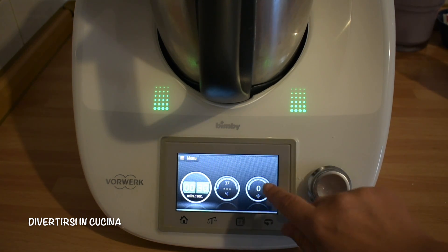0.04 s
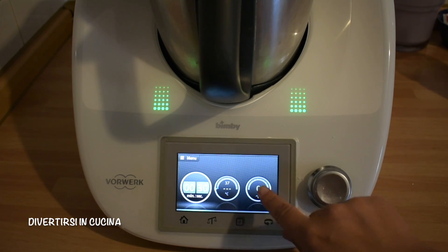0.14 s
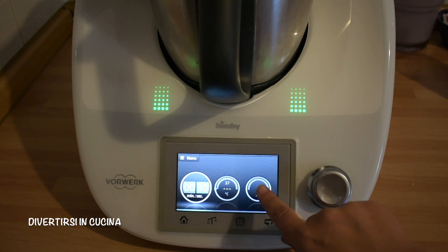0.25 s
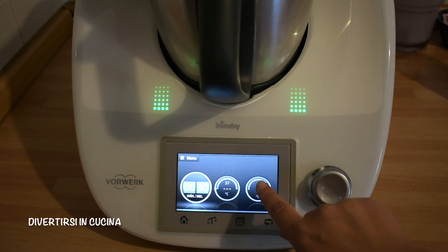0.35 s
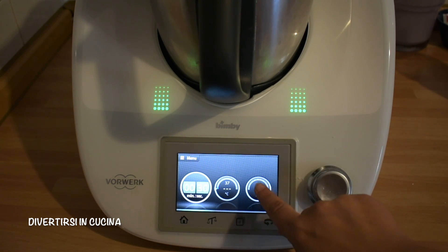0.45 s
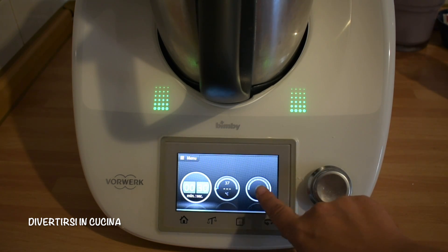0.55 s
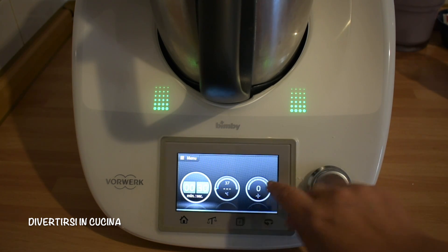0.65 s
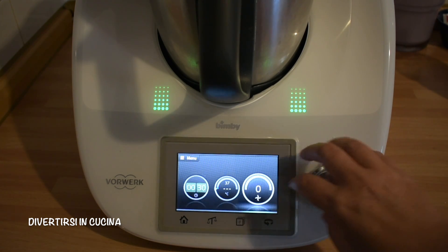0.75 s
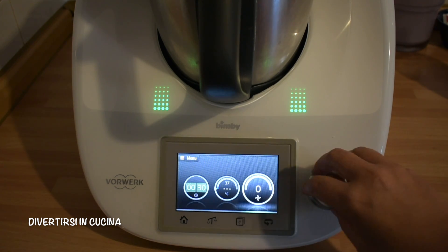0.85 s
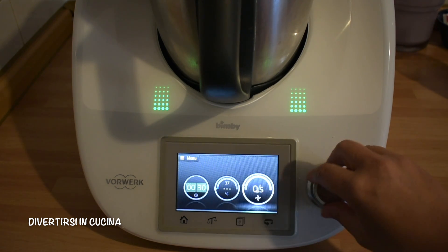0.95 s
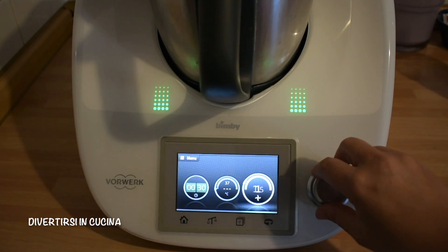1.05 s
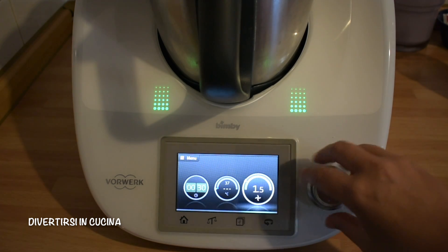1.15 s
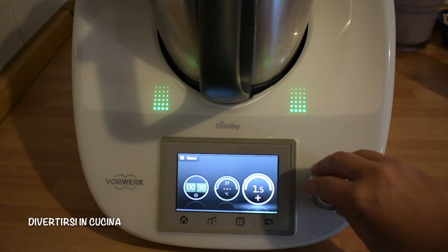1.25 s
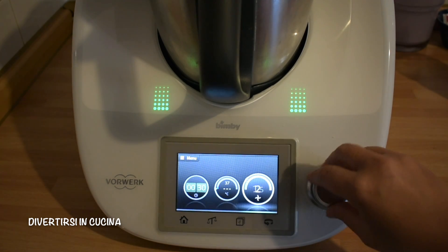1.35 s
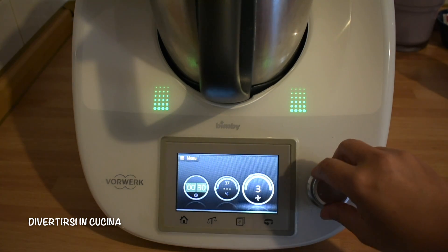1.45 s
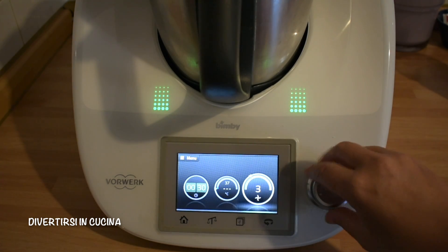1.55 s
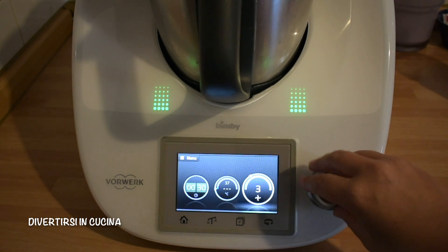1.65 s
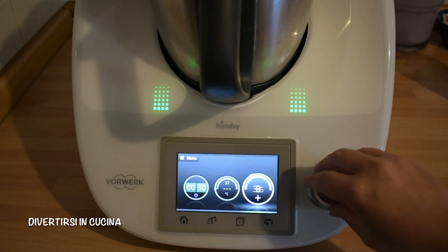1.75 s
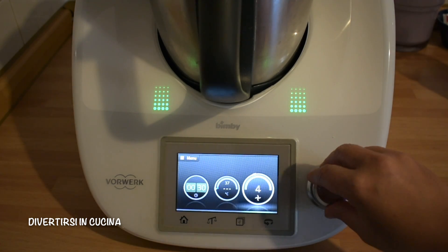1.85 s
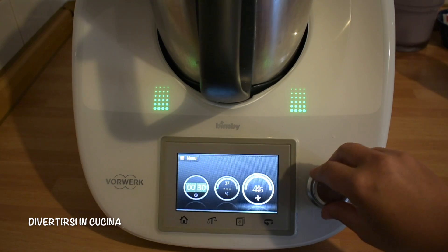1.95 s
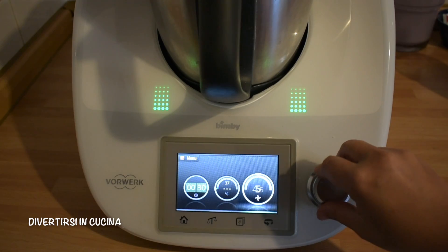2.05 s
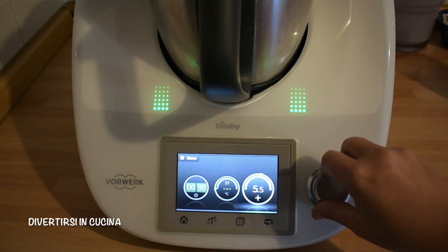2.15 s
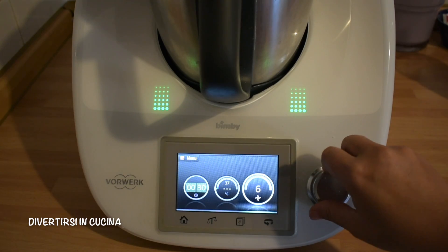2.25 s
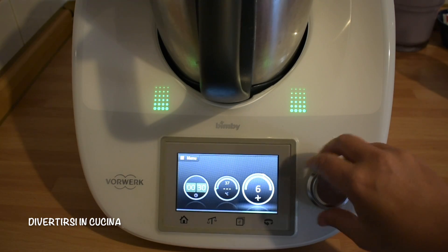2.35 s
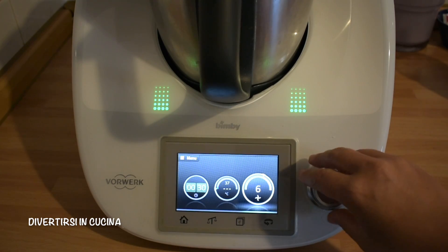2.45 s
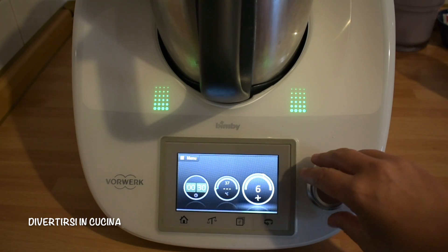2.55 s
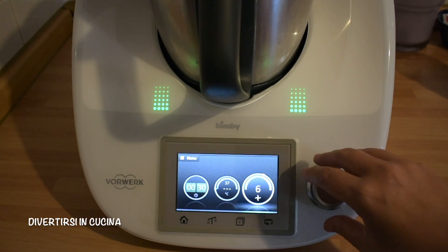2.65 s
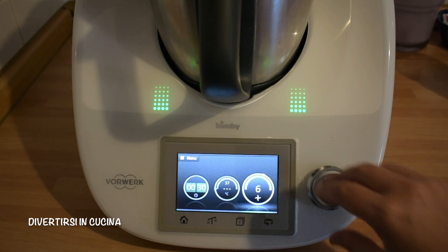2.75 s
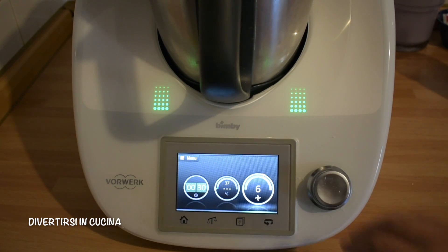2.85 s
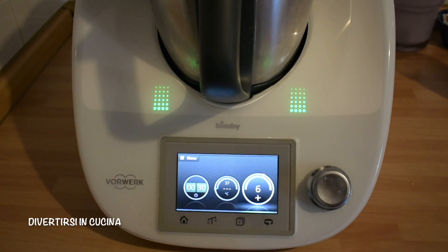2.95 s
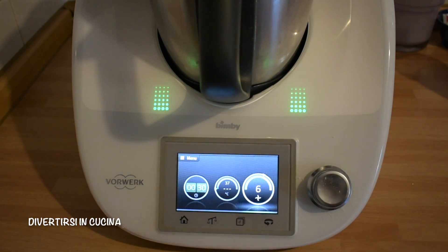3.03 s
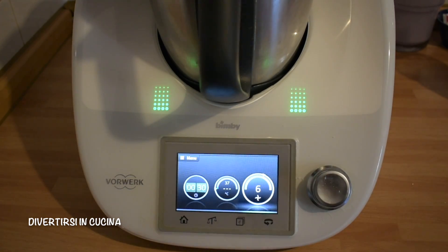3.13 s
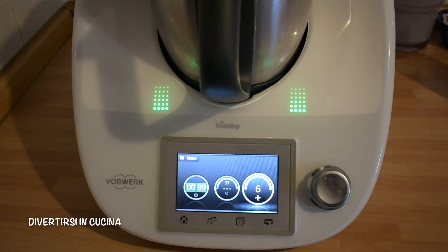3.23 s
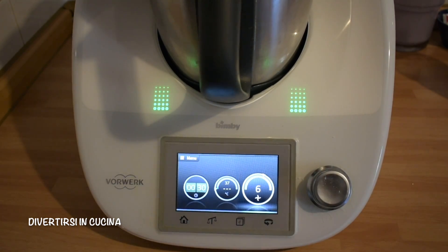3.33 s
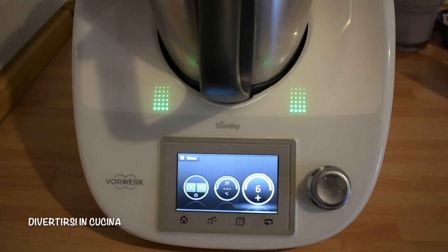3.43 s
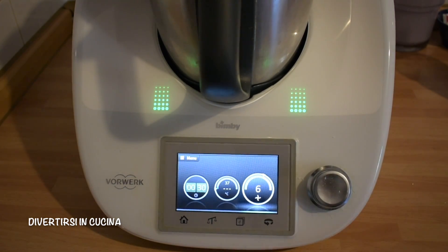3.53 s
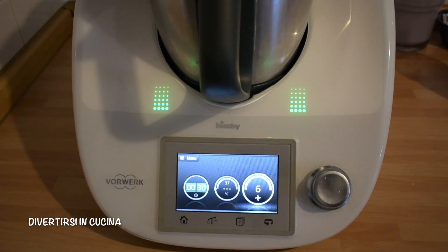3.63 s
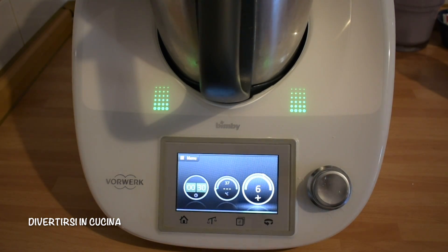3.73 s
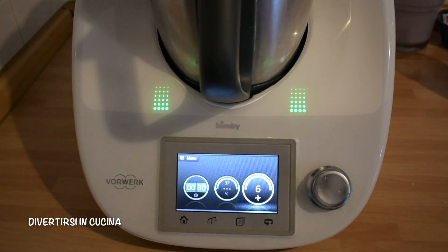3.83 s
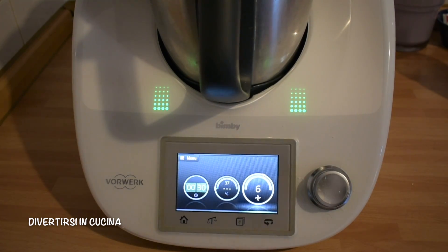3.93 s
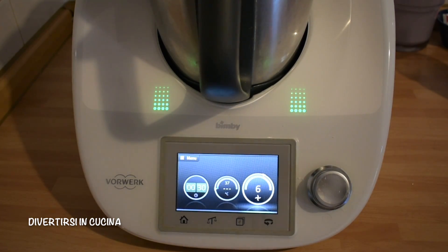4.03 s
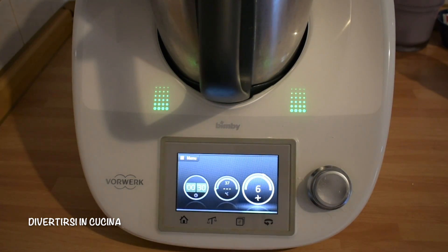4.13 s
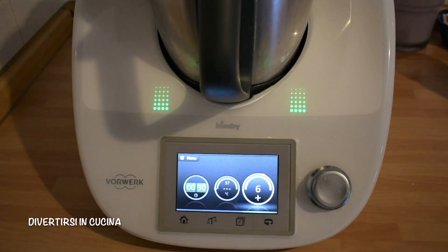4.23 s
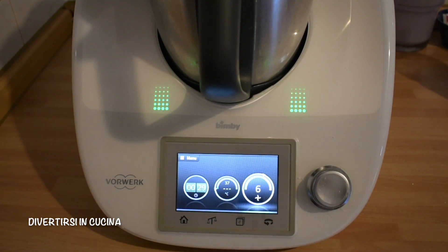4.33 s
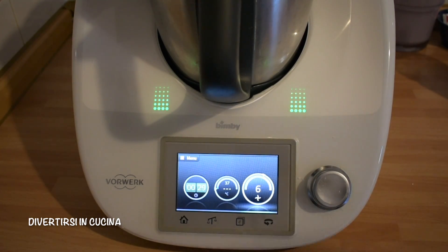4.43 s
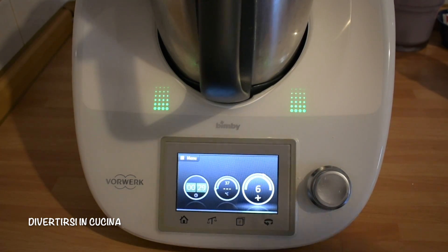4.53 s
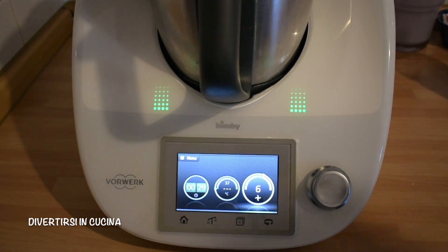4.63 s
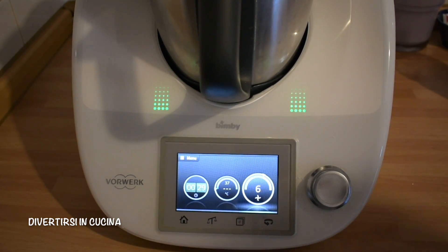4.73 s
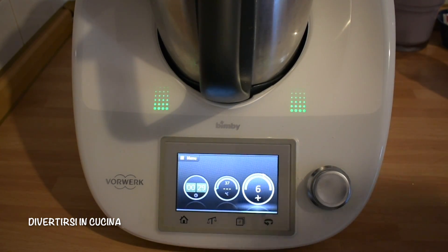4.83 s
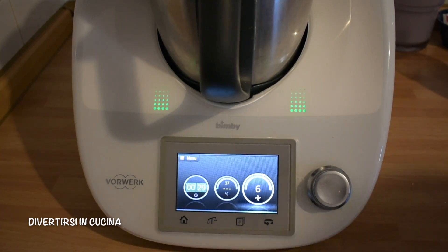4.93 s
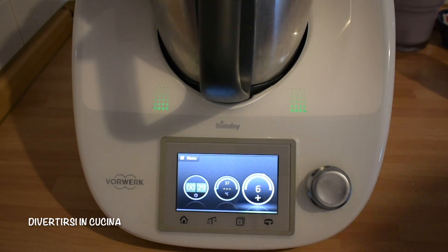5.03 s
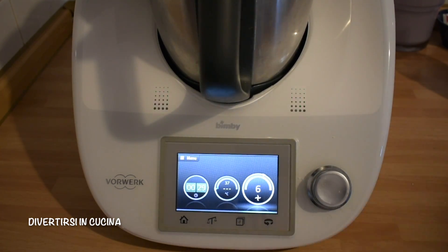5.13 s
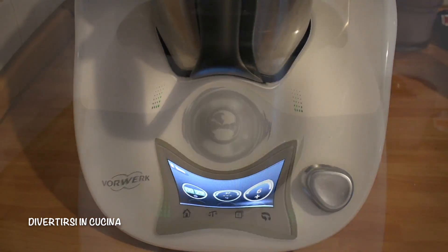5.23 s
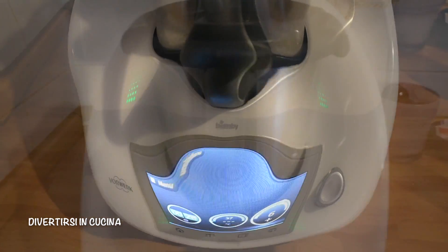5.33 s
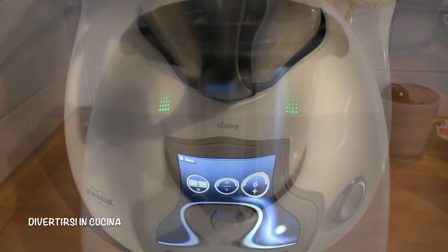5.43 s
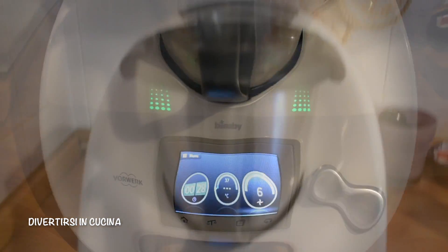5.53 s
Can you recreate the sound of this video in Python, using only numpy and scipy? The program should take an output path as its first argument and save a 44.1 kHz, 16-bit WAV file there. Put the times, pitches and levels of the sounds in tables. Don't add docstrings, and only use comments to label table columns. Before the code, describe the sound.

A kitchen food processor, miked very close in a small room with short reverberation. From 0 to 0.5 s a low room rumble fades while a distant bird chirps faintly outside. From about 0.97 s crisp plastic clicks come in an irregular cluster until 1.2 s, with soft hand thuds; more follow at 1.4-1.5 s and 1.8-2.3 s. Beneath them, from 1.0 to 1.7 s, a small geared motor whirs with a buzzy whine, sagging in pitch as it strains and stalls. A quiet gap, then a hard, bright relay snap at 2.65 s. From 2.85 s the main motor gives faint accelerating jerks, breaks into rotation near 3.1 s with a strong metallic ring around 1.9 kHz, and is loud by 3.2 s. Until the end at about 5.6 s it runs nearly steady: midrange hum and whine, steel jug rattle, gritty hiss, and irregular surges as nuts strike the blade, rising slightly in pitch near 4.65 s.

```python
import sys
import numpy as np
from scipy import signal
from scipy.fft import rfft, irfft, next_fast_len
from scipy.io import wavfile
from scipy.ndimage import map_coordinates

SR = 44100
rng = np.random.default_rng(int(sys.argv[2]) if len(sys.argv) > 2 else 0)


def wav_record(signal):
    frames = np.transpose(np.atleast_2d(signal))
    bounded = np.clip(frames, -1, 1)
    quanta = np.round(bounded * 32767).astype(np.int16)
    wavfile.write(sys.argv[1], SR, quanta)


def convert_level_to_amplitude(level_db):
    exponent = np.asarray(level_db, float) / 20
    return 10 ** exponent


N = 246078
TIME = np.arange(N) / SR


def unit(x):
    return x / np.sqrt(np.mean(x ** 2) + 1e-20)


def along(points, hz):
    f, v = np.transpose(points)
    return np.interp(np.log(hz + 1), np.log(f + 1), v)


def curves(rows):
    s, *columns = np.transpose(rows)
    return [np.interp(TIME, s, column) for column in columns]


def wobble(rate):
    knots = rng.standard_normal(int(N * rate / SR) + 4)
    return map_coordinates(knots, [TIME * rate])


def envelope(s, db, attack, hold, t60):
    rise = np.clip((TIME - s) / attack, 0, 1) ** 2
    released_s = np.clip(TIME - s - attack - hold, 0, None)
    return rise * convert_level_to_amplitude(db - 60 * released_s / t60)


def noise():
    return rng.standard_normal(N)


def filtered(x, response):
    m = next_fast_len(N + SR // 2)
    return irfft(rfft(x, m) * response(np.fft.rfftfreq(m, 1 / SR)), m)[:N]


def body(modes):
    def response(f):
        total = 0
        for k, (center, width, db) in enumerate(modes):
            damping = 1j * f * width
            total = total + (-1) ** k * convert_level_to_amplitude(db) * damping / (center * center - f * f + damping)
        return total
    return response


def hiss(spectrum):
    return unit(filtered(noise(), lambda hz: convert_level_to_amplitude(along(spectrum, hz))))


def bursts(rows):
    out, t = np.zeros(N + SR), np.arange(SR // 4) / SR
    for s, db, decay in rows:
        shape = (1 - np.exp(-t / 0.000994)) * np.exp(-t / max(decay, .001))
        out[round(s * SR):][:len(t)] += convert_level_to_amplitude(db) * rng.standard_normal(len(t)) * shape
    return out[:N]


def line(turns, multiple, rough_db, rate, slip):
    size = np.sqrt(2) * convert_level_to_amplitude(rough_db * wobble(rate))
    return size * np.sin(2 * np.pi * multiple * turns + slip * wobble(rate))


# start_s, level_db
CHIRPS = [
    (.078, -48.5),
    (.112, -51),
    (.18, -51),
    (.21, -53),
    (.235, -56),
    (.275, -49.5),
    (.31, -51.5),
    (.37, -55.5),
    (.4, -58.5),
    (.44, -64.5),
]
# pitch_hz, width_hz, level_db
BIRD_VOICE = [(4705, 780, 1), (5690, 900, -2.5), (13300, 250, -13)]
# pitch_hz, level_db per Hz
ROOM_RUMBLE = [(20, -32.5), (60, -5), (200, 0.5), (350, -7.5), (800, -10), (2500, -18.5), (9000, -31.5),
               (15500, -61.5)]
ROOM_HISS = [(400, -24.5), (900, 1), (3800, -2), (5500, -5.5), (10800, -10.5), (15700, -20)]
# steady level_db, level_db of an earlier noise, its fade in dB per s
ROOM_DB, FADING_DB, FADE_DB_PER_S = (-60, -62), (-38.5, -55), (39.5, 22.5)


def room():
    low, high = (np.hypot(convert_level_to_amplitude(steady), convert_level_to_amplitude(earlier - fade * TIME))
                 for steady, earlier, fade in zip(ROOM_DB, FADING_DB, FADE_DB_PER_S))
    chirps = bursts([(s, db + 13.0, .045) for s, db in CHIRPS])
    bird = filtered(chirps, lambda f: body(BIRD_VOICE)(f) ** 2)
    rumble = low * convert_level_to_amplitude(1.44 * wobble(5.86)) * hiss(ROOM_RUMBLE)
    return rumble + high * hiss(ROOM_HISS) + bird


# start_s, snap_db, knock_db and tick_db (re snap), loudest ring_hz
CLICKS = [(0.8973, -43.5, -5, -21, 530), (0.9729, -15, -15, -21, 2055), (1.0066, -12, -15.5, -23, 2230),
          (1.0262, -17, -6, -30, 537), (1.045, -12, -23, -20, 2110), (1.109, -13.5, -23.5, -20, 2210),
          (1.1829, -17, -15, -33, 1220), (1.4049, -12, -14, -21.5, 1085),
          (1.4395, -17.5, -11.5, -18.5, 2823), (1.4712, -16.5, -21.5, -15, 2440),
          (1.8294, -14, -20, -20, 2620), (1.8909, -16.5, -19, -18, 2560), (1.939, -23, -16.5, -6, 8970),
          (2.0242, -14.5, -16, -19, 2110), (2.083, -26, -12.5, -5, 9700), (2.105, -13, -17, -21, 2110),
          (2.1763, -12.5, -16.5, -19.5, 1974), (2.262, -12, -17.5, -20.5, 3173),
          (2.8145, -49, -9, -8.5, 1950)]
# pitch_hz, width_hz, level_db
HOUSING = [(170, 69, -19.5), (445, 323, -7), (678, 269, -0.5), (1096, 330, -2.5)]
LATCHES = [(1554, 190, 1), (2110, 262, 2), (2560, 285, 0), (3180, 377, 2), (4204, 630, -1.5),
           (5820, 1380, -9)]
DETENT = [(6590, 1860, 2.5), (8760, 1550, 8.5), (10400, 610, 7), (11880, 930, 3)]
# start_s, level_db, decay_s
THUDS = [
    (.915, -38.5, 0.0126),
    (1.03, -20, 0.021),
    (1.1, -31, 0.051),
    (1.19, -26.5, 0.0164),
    (1.86, -36.5, 0.019),
    (1.895, -40.5, 0.0247),
]


def clicks():
    s, db, knock_db, tick_db, ring_hz = np.transpose(CLICKS)
    chatter = np.full(len(s), 0.0069)
    knock = filtered(bursts(zip(s, db + knock_db + 22.5, chatter)), body(HOUSING))
    snap = filtered(bursts(zip(s, db + 1.5, chatter)), body(LATCHES))
    tick = filtered(bursts(zip(s, db + tick_db + 2.5, chatter)), body(DETENT))
    loudest_db = np.maximum(db, db + tick_db - 4)
    own = 0
    for at, level, decay, hz in zip(s, loudest_db, chatter, ring_hz):
        own = own + filtered(bursts([(at, level + 6, decay)]), body([(hz, .12 * hz, -1)]))
    thud = filtered(bursts(THUDS), body([(152.3, 95, 11.1), (435, 156, 11.25)]))
    return knock + snap + tick + own + thud


# start_s, gear mesh pitch_hz, effort_db
LID_MOTOR = [
    (1.08, 1310, -41),
    (1.118, 1331, -43),
    (1.202, 1289, -40),
    (1.27, 1261, -41),
    (1.382, 1231, -37),
    (1.506, 1203, -37),
    (1.624, 1133, -36.5),
    (1.655, 1020, -38),
    (1.7, 750, -45),
]
MESH_MULTIPLES = [1, 2, 2.32, 3, 3.66, 4, 4.26, 5, 7.9]
MESH_DB = [-5.5, -1, -11.5, -3, -14, -9.5, -13.5, -9.5, -25]
# pitch_hz, width_hz, level_db
LID = [(1277, 122, 1), (1666, 480, 3), (2117, 215, 4), (2509, 155, 2.5), (2935, 302, 2.5), (3355, 127, 6.5),
       (3798, 58.3, 7.5), (3966, 58, 3.5), (4876, 510, .5), (5970, 670, 1.5), (9900, 500, 4)]
GEARBOX = [(133, 61, -3), (161.7, 54, -2), (870, 133, -8.5), (1764, 72, -21.5), (2776, 93, -6),
           (3256, 44, 0), (3356, 56, -1.5), (4760, 82, -14.5), (5460, 87, -8.5)]
# pitch_hz, level_db per Hz
BRUSHES = [(200, -6.5), (700, -3), (1500, -1), (3000, -5.5), (6000, -9), (7000, -16), (15500, -27.5)]


def lock():
    mesh_hz, effort_db = curves(LID_MOTOR)
    turns = np.cumsum(mesh_hz) / SR
    tone = 0
    for k, db in zip(MESH_MULTIPLES, MESH_DB):
        lid_gain = np.abs(body(LID)(k * mesh_hz))
        tone = tone + convert_level_to_amplitude(db) * lid_gain * line(turns, k, rough_db=4, rate=50, slip=0.46 + 0.276 * k)
    case = unit(filtered(noise(), body(GEARBOX)))
    flutter = convert_level_to_amplitude(1.5 * wobble(25))
    whirr = flutter * (convert_level_to_amplitude(-1.5) * hiss(BRUSHES) + convert_level_to_amplitude(-3.0) * case)
    squeal = convert_level_to_amplitude(4.0) * np.exp(-((mesh_hz - 1140) / 45) ** 2)
    tone = tone + squeal * unit(filtered(noise(), body([(3436.6, 30.5, 0)])))
    turning = tone * envelope(1.07, 0.3, .04, .585, .06)
    brushing = whirr * envelope(0.983, 0.3, 0.0207, 0.706, 0.244)
    return convert_level_to_amplitude(effort_db) * (turning + brushing)


# pitch_hz, width_hz, level_db
CONTACTOR = [(500, 410, -14.5), (1430, 400, -5), (3260, 620, -8.5), (6340, 730, -8.5), (8010, 640, -10.5),
             (9780, 540, -6.5), (12730, 455, 1.5), (14900, 1500, -18)]
# start_s, level_db, decay_s
CONTACTOR_AT = [
    (2.6488, -6.5, 0.00376),
    (2.65, -27.5, 0.02),
]


def relay():
    return filtered(bursts(CONTACTOR_AT), body(CONTACTOR))


# start_s, peak level_db, decay_s, low ring level_db (re peak)
JOLTS = [
    (2.853, -39, 0.0244, -9.5),
    (2.88, -28.5, 0.0328, -19.5),
    (2.943, -32.5, 0.045, -7),
    (2.984, -28.5, 0.14, -10),
    (3.023, -21, 0.077, -6),
    (3.041, -16, 0.0325, -10.5),
    (3.061, -12, 0.021, -6.5),
    (3.087, -6.5, 0.21, -8),
]
# pitch_hz, width_hz, level_db
STATOR_LOW = [(217, 33, -17), (880, 12.4, 5), (1037.6, 51, -2), (1415, 20.6, -7.5)]
STATOR_HIGH = [(1560, 60, -10), (1760, 50, -6), (1850, 50, 0), (2690, 90, -21), (3450, 400, -25),
               (5420, 80, -31), (11180, 140, -32)]
# start_s, level_db, attack_s, hold_s, t60_s
START_RING = (3.055, -16, .04, .13, .15)


def start():
    s, db, hold, low_db = np.transpose(JOLTS)
    high = filtered(bursts(zip(s, db + 14.5, hold)), lambda f: body(STATOR_HIGH)(f) / (1 + 1j * f / 5000))
    low = filtered(bursts(zip(s, db + low_db + 21, hold)), body(STATOR_LOW))
    singing = envelope(*START_RING) * line(TIME, 1863, rough_db=1.2, rate=55, slip=1.1)
    return high + low + singing


# start_s, speed_hz
SHAFT = [(3.02, 18), (3.17, 30), (3.24, 35.3), (3.3, 37.2), (3.45, 38.1), (3.57, 37.3), (3.64, 38.3),
         (3.85, 38.35), (3.9, 37.6), (4.08, 37.95), (4.13, 38.4), (4.46, 38.2), (4.51, 37.45),
         (4.615, 37.5), (4.655, 39.1), (4.74, 39.65), (4.92, 39), (5.58, 38.85)]
# start_s, level_db
PULL = [(3.2, -15), (3.3, -2.5), (3.38, 3.5), (3.49, -7.5), (3.58, 0), (3.7, -2), (4.06, -5), (4.15, 0.5),
        (4.6, -1), (4.68, -6), (4.83, -23), (4.91, -1), (5.02, -15.5), (5.14, -2), (5.58, -4.5)]
# multiple, level_db, dB per dB of pull, dB per Hz of speed, unsteadiness_db
STROKES = [(24.02, -17.5, 1, 0, 2.5), (39.977, -16.5, 0.69, 3, 2), (41.073, -20.5, -0.24, 2.5, 2),
           (42.08, -27.5, 0, -1, 3), (35.43, -24.5, -0.12, 1.5, 1.5), (47.91, -26.5, -0.03, -3.28, 2.5),
           (66.17, -40, -0.41, 4.5, 2.5), (5.892, -38.5, 0.01, 3.5, 2), (11.64, -39.5, 0.03, 2.5, 2.5)]
WEAK_ORDERS = [3.12, 4.75, 16, 16.5, 22.4, 27.9, 52.1, 58.6, 69.2, 75, 81.8, 106, 129]
WEAK_ORDERS_DB = [-41, -39.5, -33.5, -36.5, -31, -32, -34.5, -37.5, -39, -37, -41, -36.5, -42]
# start_s, level_db, half_length_s
BITES = [(3.22, 6, 0.108), (3.549, 6.5, 0.035), (3.722, 1.5, 0.031), (3.783, 3.5, 0.0206),
         (3.873, 5.5, 0.043), (3.969, 5, 0.031), (4.06, 7, 0.0576), (4.226, 4.5, 0.032),
         (4.399, 2.5, 0.069), (4.526, 8, 0.0646), (4.628, 3, 0.037), (4.853, 3.5, 0.0315),
         (4.964, 3, 0.055), (5.047, 4.5, 0.05), (5.252, 4.5, 0.052), (5.355, 0.5, .05)]
# level_db, quieter before the bite dB, dB per dB of bite, sag dB per s
LAYERS = [(-16.5, 18, 0.2362, 1.28), (-23.5, 58, 0.2919, -0.06), (-34, 25, 1, 1), (-35, 12.5, 1, 1)]
# pitch_hz, width_hz, level_db
FRAME = [(466.4, 51.2, -19.5), (604.7, 135, -8), (887.5, 68.6, -3.5), (1028.2, 176.7, -8), (1342, 99.5, -7),
         (1525.7, 128.2, -4), (1665, 183.4, -4.5), (1860, 91.5, -5), (2221, 382, -18.5)]
JUG = [(2571, 482, -0.5), (3212, 105, 0.5), (3312, 135, -1), (4086, 207.6, 1), (5024, 451, -2.5),
       (6217, 548, -5), (6940, 820, -11.5)]
WORKTOP = [(128.4, 10.43, 5.5), (176.1, 14.3, 3.5), (259.5, 19.5, -7), (271.9, 14, -2), (396.3, 28.7, -1.5)]
# pitch_hz, level_db per Hz
GRIT = [(3820, -7), (6500, -13.5), (7920, -0.5), (9060, -4.5), (11000, -1.5), (12300, 0.5), (13800, -2.5),
        (15600, -12.5)]
# start_s, level_db, attack_s, hold_s, t60_s
SCRAPE = (3, -29, 0.53, 0.23, 0.03)
# start_s, level_db, attack_s, hold_s, t60_s
LURCH = (3.1, -29.5, .06, .07, .45)
CRUISE_HZ = 38.5
ENGAGE_S, SPIN_UP_S, CREEP_S = 3.095, .008, 3.035


def motor():
    speed_hz, pull_db = curves(SHAFT)[0], curves(PULL)[0]
    turns = np.cumsum(speed_hz) / SR
    bite_db = sum(db * np.exp(-((TIME - s) / half) ** 2) for s, db, half in BITES)
    idle = np.exp(-np.clip(TIME - ENGAGE_S, 0, None) / SPIN_UP_S)
    frame_db, jug_db, grit_db, bench_db = (db - quiet_db * idle + share * bite_db - sag * (TIME - 4)
                                           for db, quiet_db, share, sag in LAYERS)

    lines = 0
    for k, db, share, tilt, rough_db in STROKES:
        stroke_db = db + share * pull_db + tilt * (speed_hz - CRUISE_HZ)
        lines = lines + convert_level_to_amplitude(stroke_db) * line(turns, k, rough_db, rate=22, slip=0.737)
    weak = sum(convert_level_to_amplitude(db) * line(turns, k, rough_db=4.0, rate=9, slip=1.0)
               for k, db in zip(WEAK_ORDERS, WEAK_ORDERS_DB))
    settled = np.clip((TIME - 3.2) / .25, 0, 1)
    lines = lines + settled * convert_level_to_amplitude(-1.5) * weak
    lines = lines * np.clip((TIME - 3.17) / 0.14, 0, 1)
    lines = lines + envelope(*LURCH) * line(TIME, 115, rough_db=1.5, rate=15, slip=.6)

    struck = rng.random(N) < 2500 / SR
    force_db = 3.69 * np.minimum(rng.exponential(size=N), 4)
    impacts = struck * noise() * convert_level_to_amplitude(force_db)
    rattle = unit(impacts) * 0.518 + noise()
    frame = convert_level_to_amplitude(frame_db + 2.04 * wobble(14)) * unit(filtered(rattle, body(FRAME)))
    ringing = unit(filtered(rattle, lambda f: body(JUG)(f) * f ** 2 / (f ** 2 + 2000 ** 2)))
    jug = convert_level_to_amplitude(jug_db + 0.81 * wobble(20)) * ringing
    grinding = unit(filtered(rattle, lambda hz: convert_level_to_amplitude(along(GRIT, hz))))
    grit = convert_level_to_amplitude(grit_db + 1.09 * wobble(34)) * grinding
    bench = convert_level_to_amplitude(bench_db + 1.8 * wobble(8)) * unit(filtered(noise(), body(WORKTOP)))
    scrape = envelope(*SCRAPE) * unit(filtered(rattle, body([(2590, 690, -2.2), (3537, 570, 1.7)])))
    return (lines + frame + jug + grit + bench + scrape) * np.clip((TIME - CREEP_S) / 0.038, 0, 1)


# pitch_hz, t60_s
KITCHEN = [(150, 0.526), (1500, 0.371), (5000, 0.298), (14000, 0.246)]


def kitchen(x):
    wet, step = np.zeros(N + SR), SR // 12
    for at in range(0, 3 * SR, step):
        hz, t, z = signal.stft(rng.standard_normal(SR // 2), SR, nperseg=256)
        decay = convert_level_to_amplitude(-60 * t / along(KITCHEN, hz)[:, None])
        tail = signal.istft(z * decay, SR, nperseg=256)[1]
        answer = signal.fftconvolve(x[at:at + step], tail / np.linalg.norm(tail))
        wet[at + 300:][:len(answer)] += answer
    return wet[:N]


def scene():
    near, small = clicks() + relay(), lock()
    echo = convert_level_to_amplitude(-6.5) * kitchen(near + convert_level_to_amplitude(1) * small)
    machine = near + small + echo + start() + motor()
    bass_cut = signal.butter(4, 95, "high", fs=SR, output="sos")
    return (signal.sosfilt(bass_cut, machine) + room())[None]


def top_cut(x):
    return signal.sosfilt(signal.butter(12, 15720, fs=SR, output="sos"), x)


def record(dry):
    clipped = dry / (1 + np.abs(dry / 1.02) ** 6) ** (1 / 6)
    return top_cut(clipped)


dry = scene()
out = record(dry)
wav_record(out)
```